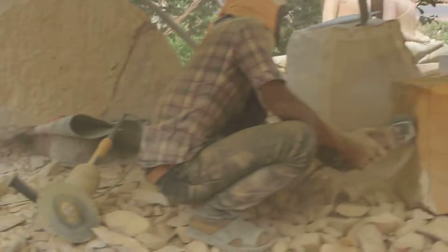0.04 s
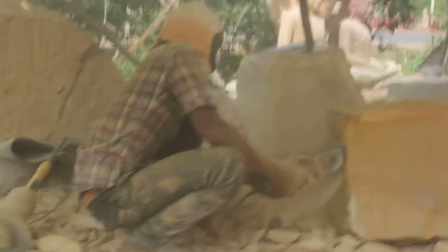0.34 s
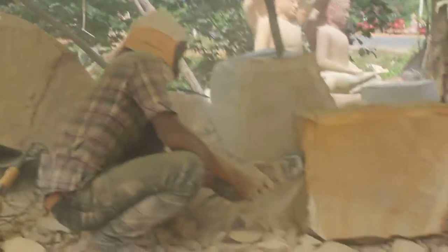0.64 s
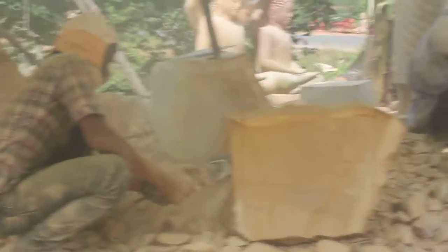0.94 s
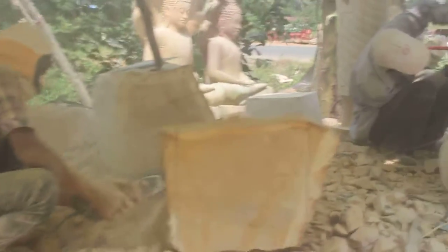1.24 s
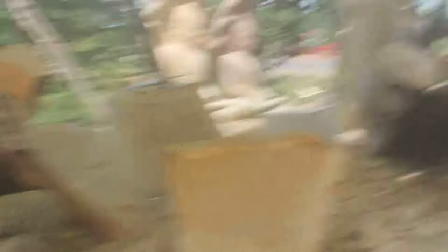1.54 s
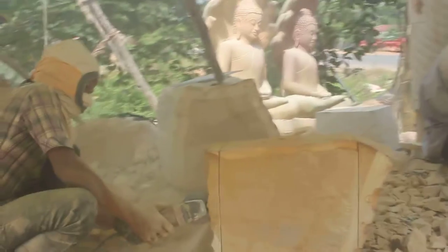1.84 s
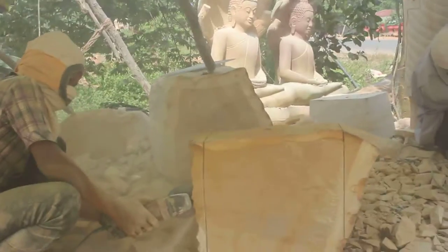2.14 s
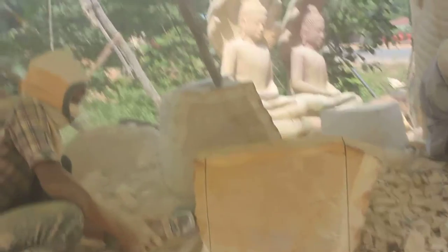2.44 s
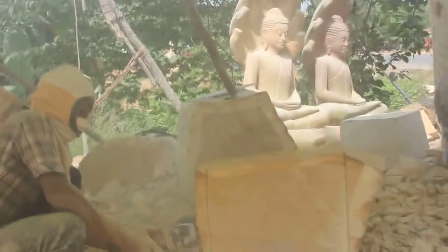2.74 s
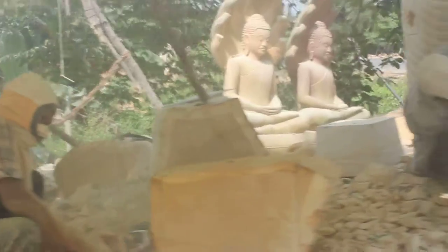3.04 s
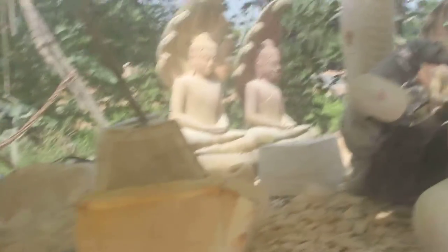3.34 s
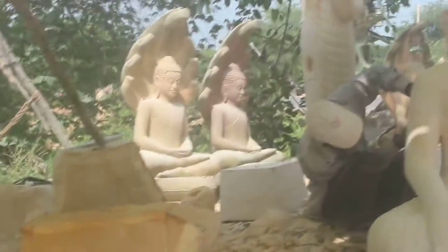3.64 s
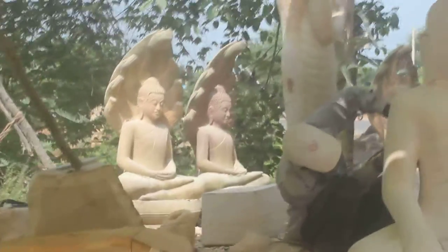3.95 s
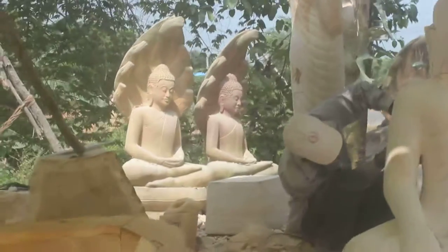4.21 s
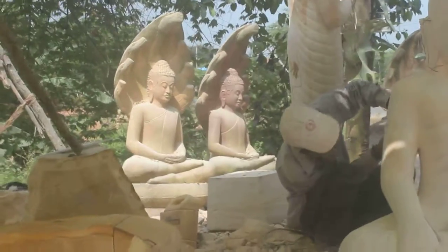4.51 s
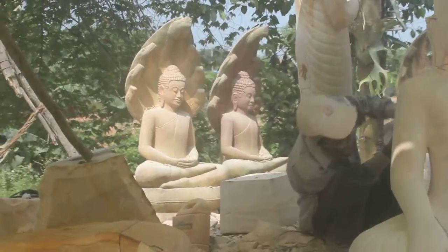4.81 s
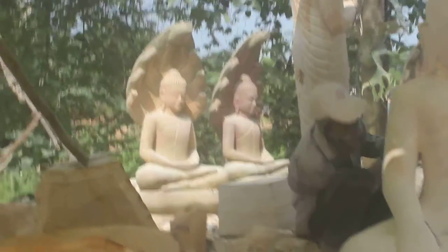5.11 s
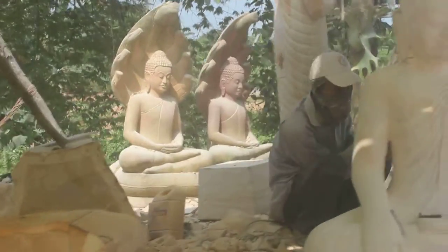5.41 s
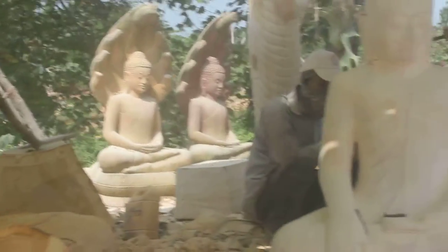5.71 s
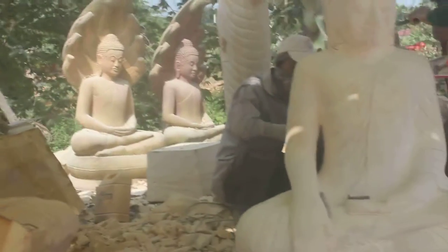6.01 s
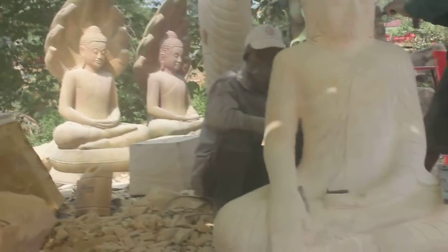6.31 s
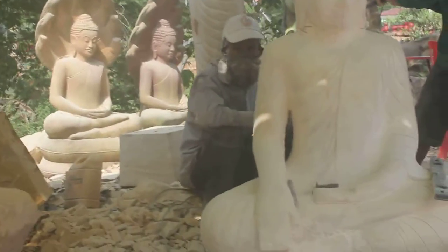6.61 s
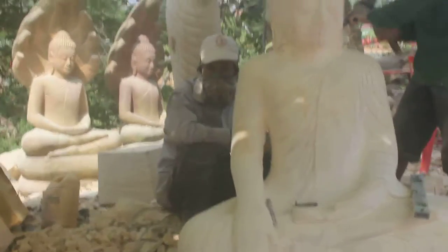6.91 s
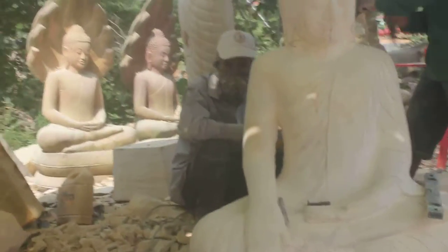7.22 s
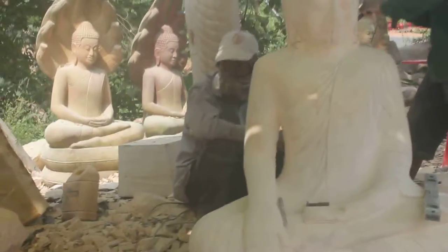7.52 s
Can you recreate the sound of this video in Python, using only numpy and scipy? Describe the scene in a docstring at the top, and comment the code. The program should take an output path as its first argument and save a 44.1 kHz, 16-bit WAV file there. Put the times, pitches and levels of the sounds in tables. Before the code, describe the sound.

From the first moment an angle grinder cuts stone loudly in an open yard: a chattering rasp with hissing grit and a high, singing steel disc, its speed wavering and brief squeals coming and going. A hammer hits a steel chisel with short, bright clinks at about 2.7, 3.5, 4.0, 4.4, 4.8, 5.8, 6.8 and 7.3 seconds. The blows at 4.8 and 7.3 are hardest and make the level dip briefly. Just after 6 seconds the first grinder eases off while a second bites in, howling and screeching, its pitch sinking under load until the end at about 7.5 seconds. Faint dull knocks on stone fall near 0.9 and 2 seconds. Far beneath the work are a low steady rumble and a fading distant engine hum. Soft gusts touch the single microphone around 3.7 and 7.2 seconds.

```python
"""Two angle grinders cut stone in an open workyard, heard at one microphone. The first rasps and
chatters while its steel disc sings; near the end it eases off and a second bites in, howling as the
load drags its speed down. Now and then a grinder squeals, a block knocks or a hammered chisel clinks;
the two hardest blows make the recorder duck. Behind the work the yard rumbles and an engine hums
far off, and gusts touch the microphone."""
import sys
import numpy as np
from scipy import signal
from scipy.fft import rfft, irfft
from scipy.io import wavfile
from scipy.ndimage import uniform_filter1d

SR = 44100
rng = np.random.default_rng(int(sys.argv[2]) if len(sys.argv) > 2 else 0)


def wrap_up_sound(samples):
    """Save the sound to the file named by the first command line argument, as 16-bit audio."""
    columns = np.atleast_2d(samples).T
    # keep every value between -1 and 1, then stretch to whole-number steps
    tamed = np.clip(columns, -1, 1)
    steps = np.round(tamed * 32767).astype(np.int16)
    wavfile.write(sys.argv[1], SR, steps)


N = 333396
TIME = np.arange(N) / SR
BINS = np.fft.rfftfreq(N, 1 / SR)

# The first grinder's speed. Each row: time in seconds, turns a second.
FIRST_SPEED = [(0, 67), (.7, 73), (1.3, 63.5), (1.8, 68), (2.4, 70.7), (3.2, 71), (3.7, 74.6), (4.1, 72),
               (4.5, 63), (4.8, 60), (5.3, 60.7), (5.7, 63), (6.1, 66), (7.5, 73)]
# How hard it bears on the stone, easing off after 6 s. Each row: time in seconds, gain in dB.
FIRST_PRESSURE = [(0, -0.5), (2.07, 0.2), (2.22, -3), (2.35, -1.3), (2.95, -1.1), (3.5, 0.4), (4.9, -0.75),
                  (5.07, 1.2), (5.55, -1.5), (5.66, -0.4), (6.1, -0.7), (6.3, -2), (6.55, -8.5),
                  (6.75, -14), (7.5, -11.5)]
# The rasp of the stone. Each row: frequency in Hz, relative level in dB.
RASP_SPECTRUM = [(100, -46), (430, -52), (600, -23.5), (900, -24), (1050, -16.5), (1500, -13.5), (1750, -8),
                 (3000, -6.5), (3500, -2.5), (4700, -7), (5350, -21), (7000, -20), (16000, -25.5)]
# Resonances of guard and block. Each row: centre in Hz, width in Hz, lift in dB.
GUARD_RESONANCES = [(742, 103, 5.5), (1024, 56, 5), (1255, 160, 3), (1565, 91, -4.5), (1654, 56, 4.5),
                    (1944, 71, 4), (2376, 170, 5.5), (2760, 92, 5), (3230, 150, 5), (3590, 340, 5),
                    (4120, 106, -8.5), (4263, 91, 9), (4470, 66, 3.5), (4616, 110, 7.5), (5000, 79, 9)]
# The hiss of grit from either grinder. Each row: frequency in Hz, relative level in dB.
GRIT_SPECTRUM = [(2000, -38.5), (5000, -5), (7000, -8), (9000, -6.5), (10400, -0.5), (11200, -0.5),
                 (12400, 3), (13250, 1.5), (14100, 3), (15700, -2.5)]
# The first disc's modes. Each row: frequency in Hz, width in Hz, level in dB against its family.
DISC_MODES = [(5790, 25, -5), (6164, 86, -2.5), (6750, 30, -12.5), (7686, 46, -1.5), (8240, 67, 0.5),
              (9200, 44, -29), (9930, 80, -10), (10025, 24, -2), (10780, 36, 4), (12800, 44, -5),
              (13700, 31, -7.5), (14640, 47, -11.5), (15300, 36, -16), (15700, 33, -11)]
# The four families of those modes. Each row: centre in Hz, gain in dB.
MODE_FAMILIES = [(6000, 1), (8270, -3.5), (10800, -4.5), (13200, 2)]
# The lowest family, muted for a while. Each row: time in seconds, gain in dB.
LOW_FAMILY_GAIN = [(0, 3), (1.25, 1.5), (2.2, -3), (3.0, -1.5), (3.8, -2.5), (4.5, 1.5), (6.3, -0.5)]
# The rumble of the yard. Each row: frequency in Hz, relative level in dB.
RUMBLE_SPECTRUM = [(20, -19), (35, -25), (60, -23), (100, 6.5), (150, 16.5), (220, -1.5), (400, -16),
                   (1000, -5), (4000, -36)]
# The far engine's hum. Each row: frequency in Hz, level in dB before the fade.
ENGINE_TONES = [(151, -57.5), (183, -60), (242, -62.5), (274.5, -64), (361, -65)]
# Its fade. Each row: time in seconds, gain in dB.
ENGINE_FADE = [(0, 1.5), (1.7, -3), (3, -4.5), (4.5, -8), (7.5, -10)]
# Notes from the grinders. Each row: middle in seconds, length in seconds, pitch in Hz, level in dB.
GRINDER_SQUEALS = [(0.285, .18, 13800, -24), (.45, 0.83, 4520, -28), (0.717, .3, 10790, -30),
                   (.75, .4, 14600, -28), (1.065, 0.28, 8270, -31), (1.2, 0.72, 5740, -30.5),
                   (1.348, .4, 14700, -34), (1.5, 0.98, 12790, -33), (1.72, 0.7, 13700, -28),
                   (1.73, 0.22, 3530, -25.5), (2.001, 0.54, 4660, -26), (2.42, 0.29, 4660, -27.5),
                   (2.748, .26, 10770, -26), (2.9, .5, 12810, -29), (3.28, 0.23, 10850, -24.5),
                   (3.297, 0.42, 8350, -27), (3.802, .26, 8290, -27.5), (4.1, 0.61, 5050, -30.5),
                   (4.132, 0.39, 10780, -23.5), (5.1, 0.27, 10060, -28), (5.2, 0.42, 4602, -29),
                   (5.42, 0.17, 14520, -28), (5.701, 0.44, 8260, -25), (5.728, 0.21, 10120, -25.5),
                   (6.05, .55, 3530, -25.5), (6.101, .5, 8295, -26.5), (6.4, .5, 10080, -29.5),
                   (6.179, .16, 1640, -33), (6.4, 0.44, 1775, -29), (6.701, .4, 2310, -33.5),
                   (6.65, 1.0, 14480, -30), (6.989, .3, 1114, -42), (7.419, 0.44, 2950, -31),
                   (7.47, .25, 1755, -34)]
# Knocks on stone. Each row: start in seconds, relative peak in dB.
STONE_KNOCKS = [(0.909, -37), (1.957, -32.5), (6.279, -45), (6.802, -42), (7.251, -34)]
# The thud of a block. Each row: frequency in Hz, relative level in dB.
THUD_SPECTRUM = [(50, -20), (130, -7), (350, 4.5), (600, 7), (1500, -12), (5000, -40)]
# Hammer blows on the chisel. Each row: start in seconds, relative peak in dB.
CHISEL_BLOWS = [(2.6794, -7), (3.5387, -4), (3.9701, -7), (4.3701, -7), (4.7543, 1), (5.754, -6.5),
                (6.8052, -3), (7.2543, 3.5)]
# The chisel's ring. Each row: frequency in Hz, relative level in dB, seconds to fall 60 dB.
CHISEL_MODES = [(4790, 5, 0.028), (4880, 3, 0.02), (5200, 1, 0.018), (5780, 2, 0.016), (6500, 0, 0.016),
                (6840, -4, .016), (8828, -5, .012)]
# Gusts on the microphone. Each row: middle in seconds, length in seconds, level in dB.
MIC_GUSTS = [(3.51, .12, -51), (3.757, .3, -45.5), (5.03, .15, -52), (6.78, .16, -56), (7.173, 0.21, -39)]
# Their low buffeting. Each row: frequency in Hz, relative level in dB.
WIND_SPECTRUM = [(20, -20), (50, -11), (80, 4), (140, 3), (250, -4), (450, -10.5), (1000, -25)]
# The second grinder's speed, sagging under load. Each row: time in seconds, turns a second.
SECOND_SPEED = [(6.25, 107), (6.37, 112.3), (6.504, 111.5), (6.684, 109), (7.08, 99.5), (7.56, 98.5)]
# How hard it bites, heard in its screech. Each row: time in seconds, gain in dB.
SECOND_PRESSURE = [(6.05, -50), (6.13, -15), (6.3, -1.5), (6.5, 0), (6.83, 0.5), (6.92, -2), (7.1, -1.8),
                   (7.25, 2), (7.56, 1.6)]
# Its low howl. Each row: frequency in Hz, relative level in dB.
HOWL_SPECTRUM = [(200, -48), (480, -33), (650, -12.5), (900, -18.5), (1080, -17), (1450, -15), (1650, -2.5),
                 (2300, -6.5), (2600, -12), (3300, -10.5), (4200, -31)]
# Its disc's low resonances. Each row: centre in Hz, width in Hz, lift in dB.
HOWL_RESONANCES = [(707, 120, 5), (1073, 110, 10), (1622, 46, 10), (1782, 120, 9), (2110, 120, -12),
                   (2238, 210, 13.5), (2950, 85, 16)]
# The howl swells as the disc enters the stone. Each row: time in seconds, level in dB.
HOWL_LEVEL = [(6.05, -75), (6.13, -33), (6.3, -27.5), (6.8, -29), (7.0, -32.5), (7.2, -28.5), (7.33, -28.5),
              (7.46, -26), (7.56, -29)]
# Its high screech. Each row: frequency in Hz, relative level in dB.
SCREECH_SPECTRUM = [(1500, -33), (3000, -17.5), (3900, -11), (4300, -4.5), (5400, -6.5), (6000, -15),
                    (6600, -10), (7000, -23.5), (8000, -11.5), (10500, -9.5), (12500, -11.5), (14500, -26),
                    (16000, -27)]
# Its disc's high resonances. Each row: centre in Hz, width in Hz, lift in dB.
SCREECH_RESONANCES = [(4120, 85, 8.9), (4303, 114, 10.3), (4660, 160, 3.1), (5390, 89, 12.2), (6270, 60, 6),
                      (6420, 89, 13.4), (6640, 43, 12), (7430, 46, 19.4), (7540, 70, 6.3), (8800, 92, 2.5),
                      (11720, 110, 5), (12500, 140, 6), (13800, 200, 10), (14500, 120, 7)]
# Its hiss, dipping as the recorder ducks after the last blow. Each row: time in seconds, level in dB.
SECOND_HISS_LEVEL = [(6.05, -70), (6.15, -27), (6.4, -25), (7.1, -21), (7.3, -27), (7.56, -22)]


def gain_of(db):
    """Decibels to a factor."""
    return 10 ** (np.asarray(db) / 20)


def unit_rms(x):
    """Scales to rms 1."""
    return x / np.sqrt(np.mean(x ** 2) + 1e-20)


def curve(rows):
    """Joins rows of time and value by straight lines."""
    return np.interp(TIME, *np.transpose(rows))


def add(mix, start, sound):
    """Lays a sound into the mix at a start in seconds."""
    part = mix[max(round(start * SR), 0):][:len(sound)]
    part += sound[:len(part)]


def colour(x, spectrum, resonances=()):
    """Filters by a broad spectrum with resonant lifts and dips, to rms 1."""
    hz, db = np.transpose(spectrum)
    db = np.interp(np.log(BINS + 1), np.log(hz), db)
    for centre, width, lift in resonances:
        db = db + lift / (1 + (2 * (BINS - centre) / width) ** 2)
    # minimum phase, so the ringing follows each click
    cepstrum = irfft(np.log(gain_of(db)), N)
    cepstrum[1:N // 2] *= 2
    cepstrum[N // 2 + 1:] = 0
    return unit_rms(irfft(rfft(x) * np.exp(rfft(cepstrum)), N))


def flutter(slow_hz, fast_hz):
    """Random wavering of rms 1 between two rates."""
    band = BINS / (BINS + slow_hz) / np.sqrt(1 + (BINS / fast_hz) ** 2)
    band /= 1 + (BINS / (8 * fast_hz)) ** 2
    return unit_rms(irfft(rfft(rng.standard_normal(N)) * band, N))


def contact(turns, chatter, beat_db, wobble_db, chatter_db):
    """The disc presses once a turn, rocks every second turn and skips at random."""
    angle = 2 * np.pi * turns
    force_db = beat_db * np.cos(angle) + wobble_db * np.cos(angle / 2) + chatter_db * chatter
    return unit_rms(gain_of(force_db))


def grains(per_s, spread_db):
    """Grit breaks away in dense clicks of uneven size."""
    size = gain_of(spread_db * np.minimum(rng.exponential(1, N), 5))
    return unit_rms(rng.standard_normal(N) * size * (rng.random(N) < per_s / SR))


def scrape(turns, rim_share, per_s, spread_db, harmonics=140):
    """The rim's teeth come round alike every turn; the stone crumbles anew."""
    phases = np.exp(2j * np.pi * rng.random(harmonics))
    phases[0] = 0
    teeth = irfft(phases, 4096)
    rim = unit_rms(np.interp(turns % 1, np.arange(len(teeth)) / len(teeth), teeth))
    return np.sqrt(rim_share) * rim + np.sqrt(1 - rim_share) * grains(per_s, spread_db)


def ring(drive, hz, width_hz):
    """One driven resonance, its pitch following the curve hz, at rms 1."""
    carrier = np.exp(2j * np.pi * np.cumsum(hz) / SR)
    envelope = signal.lfilter([1], [1, -np.exp(-np.pi * width_hz / SR)], drive * carrier.conj())
    return unit_rms((carrier * envelope).real)


def first_grinder():
    """Chattering contact drives the rasp of the stone, the hiss of grit and the singing disc."""
    speed, pressure_db = curve(FIRST_SPEED), curve(FIRST_PRESSURE)
    turns = np.cumsum(speed) / SR
    chatter = flutter(slow_hz=4.3, fast_hz=45)
    press = contact(turns, chatter, beat_db=1.84, wobble_db=0, chatter_db=1.5)
    cutting = press * scrape(turns, rim_share=0.089, per_s=11000, spread_db=1.5)
    rasp = colour(cutting, RASP_SPECTRUM, GUARD_RESONANCES)
    spray = contact(turns, chatter, beat_db=1.0, wobble_db=-0.2, chatter_db=1.83)
    spurts = gain_of(flutter(slow_hz=2.2, fast_hz=6.3))
    grit = colour(spray * spurts * grains(per_s=18000, spread_db=-3.5), GRIT_SPECTRUM)
    push = contact(turns, chatter, beat_db=-0.1, wobble_db=-1.1, chatter_db=0.35)
    song = singing_disc(push * scrape(turns, rim_share=0.067, per_s=9000, spread_db=1.5), speed)
    # grit and song follow the pressure less than the rasp does
    return (gain_of(-20 + pressure_db) * rasp
            + gain_of(-22.5 + 0.5 * pressure_db) * grit
            + gain_of(-31 + 0.64 * pressure_db) * song)


def singing_disc(drive, speed):
    """The rim drives the disc's modes, which wander together and rise as spin stiffens the steel."""
    usual_speed, stiffen_hz, wander_hz = 68, 3.4, 14.4  # stiffen_hz for each extra turn a second
    shift_hz = stiffen_hz * (speed - usual_speed) + wander_hz * flutter(slow_hz=1, fast_hz=4.9)
    low_family_db = curve(LOW_FAMILY_GAIN)
    song = np.zeros(N)
    for hz, width_hz, db in DISC_MODES:
        family = np.argmin([abs(centre - hz) for centre, _ in MODE_FAMILIES])
        grab_db = 2.75 * flutter(slow_hz=2.2, fast_hz=15)  # each mode catches and lets go on its own
        level_db = db + MODE_FAMILIES[family][1] + low_family_db * (family == 0)
        song += gain_of(level_db) * ring(drive * gain_of(grab_db), hz + shift_hz, width_hz)
    return song


def yard_rumble():
    """The open yard rumbles, low and steady, behind the work."""
    return gain_of(-61.5) * colour(rng.standard_normal(N), RUMBLE_SPECTRUM)


def far_engine():
    """An engine hums far off, its tones wavering together as it fades."""
    clock = TIME + np.cumsum(0.0048 * flutter(slow_hz=0.3, fast_hz=3.3)) / SR
    hum = sum(gain_of(db) * np.sin(2 * np.pi * (hz * clock + rng.random())) for hz, db in ENGINE_TONES)
    return gain_of(curve(ENGINE_FADE)) * hum


def squeals():
    """Single notes from the grinders swell, tremble and die away."""
    out = np.zeros(N)
    tremble = unit_rms(gain_of(2.1 * flutter(slow_hz=5.2, fast_hz=40)))
    for middle, length, hz, db in GRINDER_SQUEALS:
        arch = np.sin(np.pi * np.arange(0, 1, 1 / (length * SR)))
        noise = rng.standard_normal(2 * SR)[:len(arch)]
        note = ring(noise, np.full(len(arch), hz), width_hz=31)
        add(out, middle - length / 2, gain_of(db) * arch * note)
    return out * tremble


def stone_knocks():
    """Heavy blocks take a blow with a dull, short thud."""
    t, out = np.arange(SR // 6) / SR, np.zeros(N)
    body = colour(rng.standard_normal(N), THUD_SPECTRUM)
    envelope = np.exp(-t / 0.017) * (1 - np.exp(-t / 0.0012))
    for start, peak_db in STONE_KNOCKS:
        thud = body[rng.integers(N - len(t)):][:len(t)] * envelope
        add(out, start, gain_of(peak_db - 2) * thud / abs(thud).max())
    return out


def chisel():
    """A hammer meets a steel chisel: a short crack and a bright ring."""
    t, out = np.arange(SR // 8) / SR, np.zeros(N)
    attack = 1 - np.exp(-t / 0.00061)
    for start, peak_db in CHISEL_BLOWS:
        ringing = np.zeros(len(t))
        for hz, db, t60 in CHISEL_MODES:
            cycles = hz * rng.uniform(1.0, 1.015) * t + rng.random()
            ringing += gain_of(db - 60 * t / t60) * np.sin(2 * np.pi * cycles)
        crack = 0.66 * rng.standard_normal(len(t)) * np.exp(-t / 0.0031)
        clink = (ringing + crack) * attack
        add(out, start, gain_of(peak_db - 2.5) * clink / abs(clink).max())
    return out


def gusts():
    """Short, lumpy gusts buffet the microphone."""
    fall_db = 7.5  # from a gust's peak to either end
    buffeting = rng.standard_normal(N) * gain_of(3.4 * flutter(slow_hz=5, fast_hz=25))
    swells = sum(gain_of(db - fall_db * (2 * (TIME - middle) / length) ** 2)
                 for middle, length, db in MIC_GUSTS)
    return swells * colour(buffeting, WIND_SPECTRUM)


def second_grinder():
    """The harmonics of a slowing disc slide down through its fixed resonances, over a hiss of grit."""
    speed = curve(SECOND_SPEED) * (1 + 0.002 * flutter(slow_hz=3.4, fast_hz=25))
    turns = np.cumsum(speed) / SR
    chatter = flutter(slow_hz=5.5, fast_hz=40)
    press = contact(turns, chatter, beat_db=-0.2, wobble_db=-0.5, chatter_db=0.6)
    howl_drive = press * scrape(turns, rim_share=0.48, per_s=13000, spread_db=2.0)
    howl = colour(howl_drive, HOWL_SPECTRUM, HOWL_RESONANCES)
    screech_drive = press * scrape(turns, rim_share=0.17, per_s=14000, spread_db=1.2, harmonics=80)
    screech = colour(screech_drive, SCREECH_SPECTRUM, SCREECH_RESONANCES)
    hiss = colour(press * grains(per_s=18000, spread_db=0.2), GRIT_SPECTRUM)
    return (gain_of(curve(HOWL_LEVEL)) * howl
            + gain_of(-19 + curve(SECOND_PRESSURE)) * screech
            + gain_of(curve(SECOND_HISS_LEVEL)) * hiss)


def scene():
    """The stonework and the yard around it, at one microphone."""
    work = first_grinder() + second_grinder() + squeals() + chisel() + stone_knocks()
    return (work + yard_rumble() + far_engine() + gusts())[None]


def record(dry):
    """The recorder cuts the lows, ducks after the hardest blows and loses the highest treble."""
    low_cut_hz, high_cut_hz = 45, 15800
    limit_db, recover_db_per_s = -12.5, 22
    mic = signal.sosfilt(signal.butter(2, low_cut_hz, "high", fs=SR, output="sos"), dry)
    power_db = 10 * np.log10(abs(uniform_filter1d(mic[0] ** 2, size=200)) + 1e-12)
    recovery_db = recover_db_per_s * TIME
    held_db = np.maximum.accumulate(power_db + recovery_db) - recovery_db  # each peak sinks slowly
    over_db = np.maximum(held_db - limit_db, 0)
    ducked = mic * gain_of(-uniform_filter1d(over_db, size=100))
    high_cut = signal.firwin(1023, high_cut_hz, window=("kaiser", 9), fs=SR)
    return signal.oaconvolve(ducked, high_cut[None], "same")


dry = scene()
out = record(dry)
wrap_up_sound(out)
```